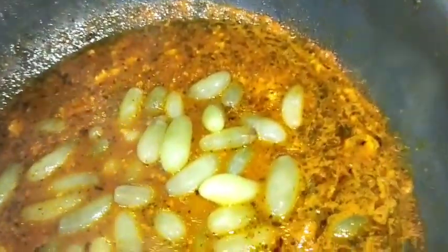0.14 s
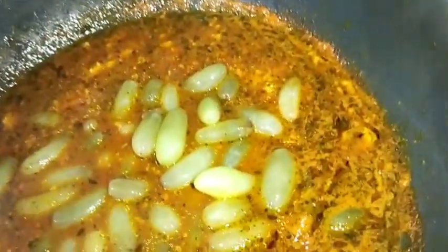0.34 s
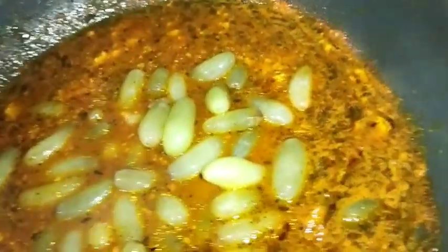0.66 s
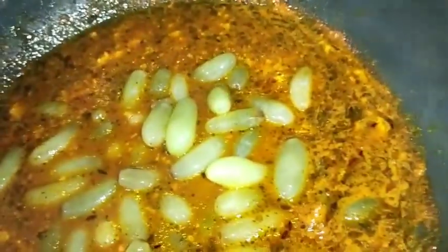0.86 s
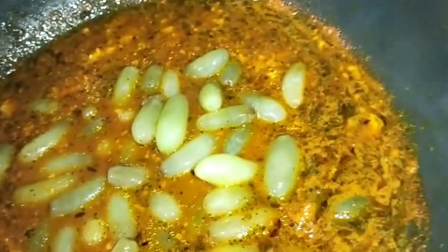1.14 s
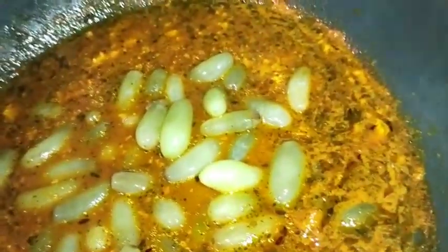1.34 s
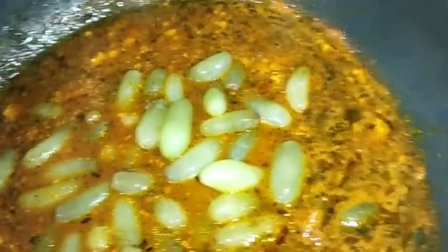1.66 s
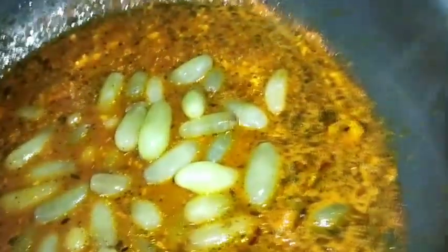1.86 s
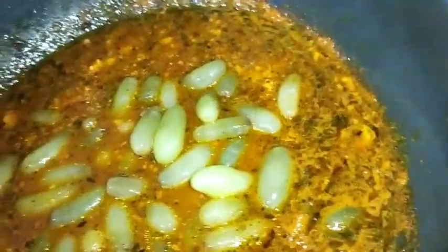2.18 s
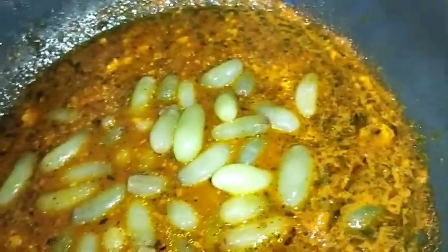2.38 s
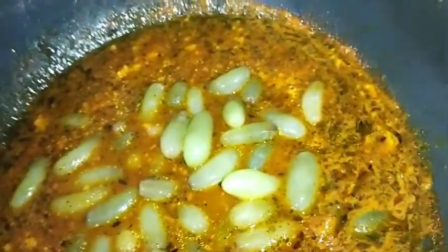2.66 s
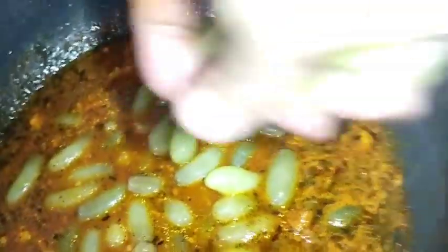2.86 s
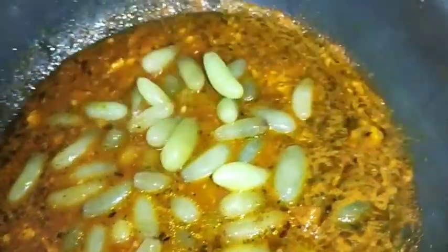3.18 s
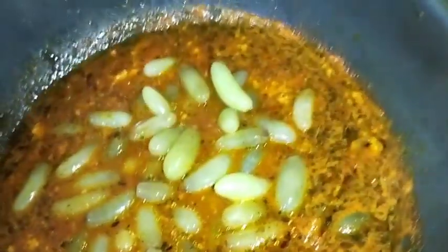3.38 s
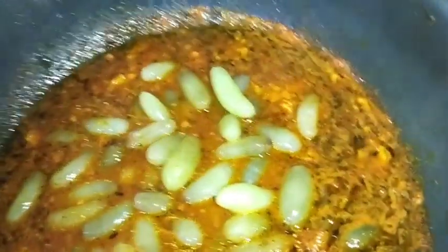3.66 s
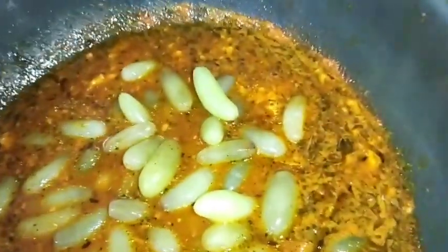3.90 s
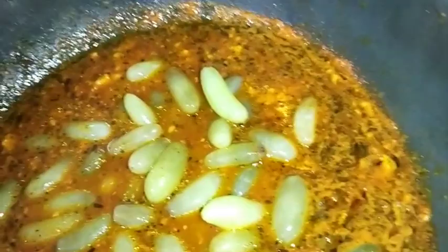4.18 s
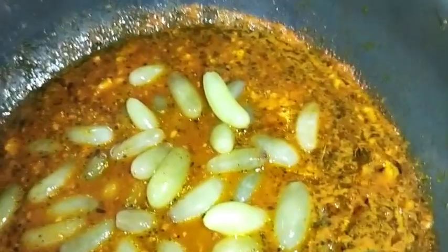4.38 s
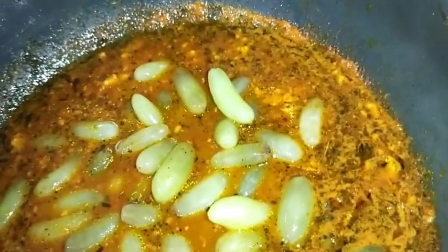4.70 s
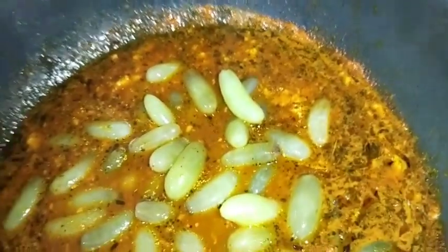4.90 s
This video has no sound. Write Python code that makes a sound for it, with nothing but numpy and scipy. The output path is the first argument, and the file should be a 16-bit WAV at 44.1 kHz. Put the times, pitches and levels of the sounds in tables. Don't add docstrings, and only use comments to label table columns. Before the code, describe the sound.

First a bowl is set down, clacking brightly and ringing briefly over soft, low bubbling. Before two seconds a sharp lid clack comes, then a smaller rim clatter. The simmer continues with muffled plops, gulps and faint fat spits, until a door shuts with a soft thud. Reverberant home kitchen, stereo handheld microphones, faint hiss, little deep bass.

```python
import sys
import numpy as np
from scipy import signal
from scipy.fft import rfft, irfft, next_fast_len
from scipy.io import wavfile
from scipy.ndimage import uniform_filter1d, map_coordinates

SR = 44100
rng = np.random.default_rng(int(sys.argv[2]) if len(sys.argv) > 2 else 0)


def generate_wav(signal):
    frames = np.transpose(np.atleast_2d(signal))
    scaled = np.clip(frames, -1, 1) * 32767
    pcm = np.round(scaled).astype(np.int16)
    wavfile.write(sys.argv[1], SR, pcm)


def ratio(d):
    e = np.asarray(d, float) / 20
    return 10 ** e


N = 222395

# time in seconds, strength in dB.
BOIL_STRENGTH = [(0.5, -61), (0.55, -72.5), (1.32, -62.5), (1.44, -72), (1.66, -63), (2.31, -61.5),
                 (2.43, -71.5), (2.52, -63), (2.6, -67.5), (2.72, -62), (2.87, -76), (3.01, -56.5),
                 (3.33, -72.5), (3.78, -67), (3.84, -73), (4.39, -61), (4.5, -69), (4.72, -55)]


def simmer():
    boil_db = np.interp(np.arange(N) / SR, *np.transpose(BOIL_STRENGTH))
    cluster_bubbling, cluster_steaming = bubble_clusters()
    bubbling = ratio(boil_db - 12) + cluster_bubbling
    steaming = ratio(boil_db - 13) + cluster_steaming
    roll = wobble(21.995)
    liquid = rumble(boil_db, roll) + bubbles(bubbling, roll) + ratio(-5) * bubbling * single_bubbles()
    return liquid + steam(steaming, roll) + pan_hum(boil_db) + pan_wall(bubbling)


# start in seconds, length in seconds, bubbling in dB, steam against bubbling in dB.
CLUSTERS = [(0.341, 0.12, -70.5, 9.5), (0.778, 0.022, -64.5, -10), (0.959, 0.042, -70, -2.5),
            (1.115, 0.11, -68.5, -0.5), (1.291, 0.19, -76.5, -4), (1.529, 0.029, -53, -10.5),
            (1.602, 0.1, -61, -8), (2.142, 0.051, -66, -8.5), (2.277, 0.17, -66.5, -7),
            (2.465, 0.14, -75, -4), (2.595, 0.088, -63, -5.5), (2.773, 0.051, -64, -12.5),
            (2.875, 0.047, -62.5, -19), (2.953, 0.13, -60, -19), (3.202, 0.097, -67, -14.5),
            (3.268, 0.042, -60, -8.5), (3.405, 0.064, -71, -2.5), (3.505, 0.1, -66, -10),
            (3.702, 0.027, -64, -15), (3.795, 0.17, -60, -11), (3.984, 0.062, -81, 11.5),
            (4.036, 0.047, -63.5, -9.5), (4.083, 0.16, -60.5, -4.5), (4.279, 0.1, -61, -4.5),
            (4.324, 0.16, -82, 13), (4.422, 0.079, -61.5, -25), (4.535, 0.11, -59, -12.5)]


def bubble_clusters():
    shape = dict(rise_s=0.013, sag_db=8, t60=0.25)
    bubbling = swells([(s, length, db) for s, length, db, _ in CLUSTERS], **shape)
    steaming = swells([(s, length, db + over) for s, length, db, over in CLUSTERS], **shape)
    return bubbling, steaming


# frequency in Hz, level in dB per Hz.
RUMBLE_SPECTRUM = [(24, -40), (40, -26), (96, 0.5), (140, -3), (255, -1.5), (323, -13), (350, -4.5),
                   (460, -36.5), (770, -120)]


def rumble(boil_db, roll):
    gain = ratio(boil_db + 0.5 * roll + 0.83 * wobble(30))
    return gain * rush(coloured(RUMBLE_SPECTRUM), patchy_db=1.5)


# frequency in Hz, level in dB per Hz.
BUBBLE_SPECTRUM = [(260, -43), (450, -10.5), (599, -6), (741, -4), (936, -7), (1010, -3.5), (1050, -16),
                   (1160, -4.5), (1600, -12), (2080, -34.5), (3520, -120)]


def bubbles(bubbling, roll):
    gain = bubbling * ratio(1.8 * roll + 2.4 * wobble(40))
    return gain * rush(coloured(BUBBLE_SPECTRUM), patchy_db=2.2)


def single_bubbles(count=900):
    t = np.arange(1500) / SR
    when, size, side = rng.random((count, 3)).T[:, :, None]
    hz = 758 * np.exp(0.35 * rng.standard_normal((count, 1)))
    age = t * hz / 3
    envelope = ratio(-2.5 * np.log(1 - size)) * age * np.exp(-4 * age)
    tone = envelope * np.sin(2 * np.pi * hz * t * (1 + 0.064 * age))
    at = ((when * N).astype(int) + np.arange(len(t))).ravel()
    gains = (side + .5, 1.5 - side)
    return unit(np.array([np.bincount(at, (tone * g).ravel(), N)[:N] for g in gains]))


# frequency in Hz, level in dB per Hz.
STEAM_SPECTRUM = [(760, -37), (1300, -16.5), (1600, -33), (1850, 1), (2550, -2), (2850, -4.5), (3300, -8.5),
                  (4020, -6), (4410, -7.5), (7100, -18), (8460, -14), (11500, -24.5), (15400, -25)]
# frequency in Hz, width in Hz, level in dB.
STEAM_JETS = [(1809, 66, -1.5), (2015, 43, -2), (2920, 34, -2), (3514, 99, -4), (4070, 60, -3.5),
              (5700, 37, -8), (6520, 35, -7), (8350, 200, -7)]


def steam(steaming, roll):
    broad = rush(coloured(STEAM_SPECTRUM), patchy_db=1.5)
    whistles = rush(resonances(STEAM_JETS), patchy_db=2.5)
    return steaming * ratio(1.5 * roll + 1.6 * wobble(55)) * (broad + ratio(-3) * whistles)


# frequency in Hz, width in Hz, level in dB.
PAN_MODE = [(415, 58, 0)]
# start in seconds, length in seconds, hum in dB.
FLOOR_BUBBLES = [(.002, 0.039, -52), (.05, 0.037, -48), (.2, 0.14, -54.5), (.41, 0.017, -45.5),
                 (.585, 0.035, -62), (.78, 0.034, -53), (1.111, 0.016, -66), (1.19, 0.023, -62.5),
                 (1.56, 0.042, -69), (1.82, 0.045, -69), (1.97, 0.12, -77), (2.042, 0.045, -54.5),
                 (2.22, 0.068, -52), (2.35, 0.057, -67.5), (2.478, 0.047, -63), (2.545, 0.03, -60),
                 (2.61, 0.039, -57), (2.716, 0.02, -61.5), (2.9, 0.024, -66.5), (2.968, 0.02, -45.5),
                 (3.01, 0.014, -42.5), (3.045, 0.034, -53), (3.105, 0.013, -51.5), (3.205, 0.014, -62.5),
                 (3.415, 0.0086, -57.5), (3.645, 0.019, -67.5), (4.035, 0.1, -63), (4.145, 0.03, -48.5),
                 (4.35, .11, -64.5), (4.535, 0.04, -64), (4.6, 0.065, -55.5), (4.75, 0.18, -52.5)]


def pan_hum(boil_db):
    humming = ratio(boil_db - 5) + swells(FLOOR_BUBBLES, rise_s=.005, sag_db=2, t60=.05)
    mode = evened(rush(resonances(PAN_MODE), patchy_db=0.1), share=.35)
    return humming * ratio(0.51 * wobble(26)) * mode


# frequency in Hz, width in Hz, level in dB.
WALL_MODES = [(593, 73, -2), (988, 12, 1), (1202, 36, -3.5)]


def pan_wall(bubbling):
    return ratio(-6) * bubbling * rush(resonances(WALL_MODES), patchy_db=-1.0)


def crockery():
    return bowl_set_down() + bowl_ringing() + lid() + door() + ticks()


# time
# in seconds, peak in dB, contact length in seconds, room echo in dB, brightness in dB per octave.
BOWL_LANDINGS = [
    (0.0028, -27.5, 0.011, 7.5, -1.5),
                 (0.188, -21.5, 0.0032, 5, -0.3),
    (0.198, -9.5, 0.0057, -4, -0.25),
    (0.213, -16, 0.0055, -14, -0.26),
    (0.238, -27, 0.0024, 6, -0.59),
]
# frequency in Hz, level in dB per Hz.
BOWL_SPECTRUM = [(70, -61.5), (120, -63), (224, -13.5), (310, -31), (650, -15), (1100, -9.5), (1350, -1.5),
                 (1500, -8), (2200, -8), (3100, -10), (3500, -15.5), (5000, -29), (7000, -48),
                 (15000, -73.5)]


def bowl_set_down():
    return struck(BOWL_LANDINGS, BOWL_SPECTRUM, lag=1.1)


# frequency in Hz, level in dB, decay time t60 in seconds.
RING_MODES = [(834, -9, .4), (1024, -6, .5), (1135, -7, .45), (1194, 0, .45), (1270, -7, .55),
              (1337, -5, .2), (1351, 0, .6), (1578, -7, .3), (1722, -10, .45), (1822, -7, .35),
              (1882, -5, .5), (1943, -8, .4), (2552, -10, .4), (3075, -9, .36), (3189, -3, .5),
              (3221, -3, .6), (3242, 2, .38), (4686, -16, .36), (5660, -31, .3), (7230, -28, .3),
              (7400, -31, .2), (10170, -33, .2), (11060, -36, .3), (12500, -41, .25), (13660, -43, .3)]
# time in seconds, ring in dB.
RING_BLOWS = [
    (-.035, -38),
    (.188, -42),
    (.199, -21.5),
]


def bowl_ringing():
    out, t = np.zeros((2, N + 2 * SR)), np.arange(TAIL) / SR
    hz, level, t60 = np.transpose(RING_MODES)[:, :, None, None]
    for s, db in RING_BLOWS:
        phase, speed, beat_start = rng.random((3, len(RING_MODES), 2, 1))
        phase = phase[:, :1] + [[0], [1 / 4]]
        beat_phase = 2 * np.pi * (12 * (.5 + speed) * t + beat_start)
        beats = 1 + sum(.55 * np.cos(k * beat_phase) for k in (1, 2.3))
        modes = ratio(level - 60 * t / t60) * beats * np.sin(2 * np.pi * (hz * t + phase))
        ring = np.sum(modes, 0)
        ring = ring * np.exp(-(t / .295) ** 4)
        ring = ring * (1 - .7 * np.exp(-t / .03))
        out[:, round(s * SR) + SR // 2:][:, :TAIL] += ratio(db) * ring
    return out[:, SR // 2:][:, :N]


# time in seconds, peak in dB, contact length in seconds,
# room echo in dB, brightness in dB per octave.
LID_CONTACTS = [
    (1.754, -12.5, 0.0025, -4, 0),
]
CATCH_CONTACTS = [
    (1.732, -24, 0.005, -3, 0.35),
]
RIM_CONTACTS = [
    (1.973, -50.5, 0.0029, 8, 0.3),
    (1.981, -32, 0.00067, 2.5, 0.44),
    (1.987, -21, 0.0056, -1.5, 0.25),
    (2.019, -24.5, 0.0027, -5.5, 0.23),
]
# frequency in Hz, level in dB per Hz.
LID_SPECTRUM = [(71, -57), (120, -44), (331, -15.5), (423, -13.5), (717, -6), (1010, 3.5), (1650, 1),
                (1860, 7), (2500, 2.5), (3500, 1.5), (5000, -8.5), (7120, -19.5), (8550, -10.5),
                (10500, -25.5), (13000, -30.5), (15400, -39)]
CATCH_SPECTRUM = [(240, -15), (400, -19), (956, -37), (1560, -4), (2540, -11), (3050, 8), (9310, -27),
                  (15400, -44)]
RIM_SPECTRUM = [(71, -58), (120, -31), (794, -14), (1010, -8.5), (1270, -9.5), (1830, -6.5), (2060, -7.5),
                (2480, -6), (2800, -6.5), (8380, -26), (15400, -31)]


def lid():
    catch = struck(CATCH_CONTACTS, CATCH_SPECTRUM, lag=20, slow=0.81)
    clack = ratio(2.5) * struck(LID_CONTACTS, LID_SPECTRUM, lag=18.85)
    rim = struck(RIM_CONTACTS, RIM_SPECTRUM, lag=6.2, slow=0.71)
    return catch + clack + rim


# time in seconds, peak in dB, contact length in seconds,
# room echo in dB, brightness in dB per octave.
DOOR_CONTACTS = [
    (4.733, -38, 0.0085, 2, -3.5),
    (4.739, -28.5, 0.0064, 2.9, 1.6),
    (4.747, -24, 0.0058, 5.7, -0.03),
    (4.754, -32.5, 0.014, 5.4, 0),
    (4.774, -36.5, 0.0081, 0.44, 8),
]
# frequency in Hz, level in dB per Hz.
DOOR_SPECTRUM = [(29, -41), (50, -12), (100, -8), (140, -15.5), (172, -3), (200, -10.5), (228, -10),
                 (274, -19.5), (423, -13.5), (524, -14), (577, -8.5), (847, -3.5), (1270, -10), (2210, -9),
                 (3600, -18), (4250, -12.5), (5200, -22.5), (8670, -24), (12300, -29), (15400, -45.5)]


def door():
    return struck(DOOR_CONTACTS, DOOR_SPECTRUM, slow=1.38, build_s=0.013, rise_s=0.0058)


# time in seconds, peak in dB, contact length in seconds,
# room echo in dB, brightness in dB per octave.
TICK_CONTACTS = [
    (1.614, -46.5, 0.0029, -2, 8.5),
    (2.782, -66, 0.0035, 4, -4),
    (3.556, -54.5, 0.0034, -3, 3),
    (4.27, -48, 0.0086, 11, 0.5),
    (4.547, -54, 0.004, 5.5, 7),
]
# frequency in Hz, level in dB per Hz.
TICK_SPECTRUM = [(290, -41), (500, -1.5), (913, 0.5), (1620, -17), (2100, 8.5), (2500, -3), (3270, -7),
                 (6430, -29), (8560, -29), (15400, -59)]


def ticks():
    return ratio(-3) * struck(TICK_CONTACTS, TICK_SPECTRUM, slow=0.5, rise_s=0.0007)


# time in seconds, peak in dB,
# contact length in seconds, room echo in dB, brightness in dB per octave.
GULP_EVENTS = [(1.529, -49, .004, 1.5, 0.0057), (3.331, -51.5, 0.0035, -1, 0.0026),
               (3.496, -55, .004, -3, 0.0032), (3.707, -52, 0.0042, -0.5, 0.0033),
               (4.094, -43, .008, -4, 0)]
PLOP_EVENTS = [(2.965, -45.5, 0.0086, 4.5, -1.5), (3.011, -40, 0.011, -13, 0.5),
               (3.03, -39.5, 0.0036, -2, -4), (3.046, -52, 0.004, 5.5, 2.5), (3.079, -67, 0.0073, -14, 9),
               (3.105, -47.5, 0.0049, -25, -5.5), (3.495, -56, 0.0055, -14, 2),
               (3.706, -65.5, 0.0086, -5.5, 1), (4.093, -47, 0.01, -9, -0.5)]
SPIT_EVENTS = [(0.6157, -80, 0.0018, -15, 0.24), (0.6688, -60, 0.0016, 3.5, 0.46),
               (1.125, -51, 0.0053, 3.5, 0.59), (2.195, -75, 0.0018, -17, 0.67),
               (2.2245, -55, 0.00075, 3, 1.8), (2.351, -51.5, 0.0016, -0.5, 1.2),
               (3.017, -53, 0.0013, -2, 2.2), (3.0494, -60, 0.0018, 1, 0.55),
               (4.1244, -56, 0.0016, -29, 0.5), (4.145, -54, 0.0016, 14.5, 0.18),
               (4.5126, -73, 0.0024, -37, 0.5)]
# frequency in Hz, level in dB per Hz.
GULP_SPECTRUM = [(250, -62), (480, -11.5), (720, 3), (1000, -7.5), (1400, -17), (2500, -21.5), (6000, -30),
                 (15400, -58)]
PLOP_SPECTRUM = [(47, -84), (80, -40), (218, -13), (320, -14), (428, -5.5), (889, -23.5), (1140, -52.5),
                 (2240, -39.5), (8000, -44.5), (10400, -40.5), (17600, -120)]
SPIT_SPECTRUM = [(530, -11), (900, -2.5), (1950, -10.5), (2220, -10), (3450, -10.5), (3790, -15),
                 (9930, -26), (15400, -41)]


def drops():
    gulps = struck(GULP_EVENTS, GULP_SPECTRUM, slow=0.25)
    plops = struck(PLOP_EVENTS, PLOP_SPECTRUM, slow=0.33)
    spits = struck(SPIT_EVENTS, SPIT_SPECTRUM, slow=0.25)
    return gulps + plops + spits


def struck(hits, spectrum, lag=0, slow=1, build_s=0.0014, rise_s=0.00017):
    out, t = np.zeros((2, N + 2 * SR)), np.arange(TAIL) / SR
    for s, db, length, room_db, tilt_db in hits:
        body = causal(spectrum, tilt_db)
        blow = rng.standard_normal(TAIL) * np.exp(-t / max(length, 1e-4)) * (1 - np.exp(-t / rise_s))
        direct = signal.fftconvolve(blow, body)[:TAIL]
        direct = direct / np.abs(direct).max()
        spread = body / np.linalg.norm(body) + .25 * direct[:len(body)] / np.linalg.norm(direct)
        echo = signal.fftconvolve(spread[None], kitchen(build_s, slow), axes=1)[:, :TAIL]
        delays = np.array([[lag], [0]])
        heard = filtered(direct, lambda hz: np.exp(-2j * np.pi * hz / SR * delays))
        heard = heard + ratio(room_db + 21.0) * echo
        start = round(s * SR) + SR // 2
        out[:, start:start + TAIL] += ratio(db) * heard
    return out[:, SR // 2:][:, :N]


# frequency in Hz, decay time t60 in seconds.
REVERB_TIME = [(100, 0.91), (500, 0.65), (2000, 0.44), (6000, 0.42), (14000, 0.38)]
TAIL = 32768


def kitchen(build_s, slow=1):
    hz, t, z = signal.stft(rng.standard_normal((2, TAIL)), SR, nperseg=256)
    decay = ratio(-60 * t / (slow * along(REVERB_TIME, hz)[:, None]))
    tail = signal.istft(z * decay, SR, nperseg=256)[1][:, :TAIL]
    bunches = unit(uniform_filter1d(rng.standard_normal(TAIL), size=90))
    tail = tail * ratio(1.3 * bunches)
    tail = two_ports(tail * (1 - np.exp(-np.arange(TAIL) / SR / build_s)))
    return tail / np.linalg.norm(tail[0])


# frequency in Hz, left-right correlation from -1 to 1.
LIKENESS = [(40, .95), (180, .91), (350, .82), (700, .5), (1410, -.12), (3090, .06), (15000, .06)]


def two_ports(pair):
    turn = lambda hz: np.arccos(np.clip(along(LIKENESS, hz), -1, 1)) / 2
    mid, side = filtered(pair, lambda hz: np.array([np.cos(turn(hz)), np.sin(turn(hz))]))
    return np.array([mid + side, mid - side])


# frequency in Hz, level in dB per Hz.
HISS_SPECTRUM = [(590, -32.5), (1000, 3), (1080, -10), (1210, 0.5), (1440, -32), (2060, -19), (7000, -20.5),
                 (8500, -19.5), (15400, -40.5)]


def microphone_hiss():
    return ratio(-74.5) * rush(coloured(HISS_SPECTRUM), patchy_db=3.5)


def gated(x, floor_db):
    hz, _, z = signal.stft(x, SR, nperseg=512)
    power = np.mean(np.abs(z) ** 2, 0)
    power = uniform_filter1d(uniform_filter1d(power, size=25, axis=0), size=5, axis=1)
    edge = ratio(2 * (floor_db + along(HISS_SPECTRUM, hz)))[:, None]
    gain = power ** 2 / (power ** 2 + edge ** 2)
    return signal.istft(z * gain, SR, nperseg=512)[1][:, :N]


def rush(response, patchy_db):
    z = signal.stft(rng.standard_normal((2, N)), nperseg=512)[2]
    field = rng.standard_normal(z.shape[1:])
    field = uniform_filter1d(uniform_filter1d(field, size=4, axis=0), size=7, axis=1)
    pair = signal.istft(z * ratio(patchy_db * unit(field)), nperseg=512)[1][:, :N]
    return unit(two_ports(filtered(pair, response)))


def coloured(spectrum):
    return lambda hz: ratio(along(spectrum, hz))


def resonances(peaks):
    def response(f):
        total = 0
        for k, (centre, width, db) in enumerate(peaks):
            damping = 1j * f * width
            total = total + (-1) ** k * ratio(db) * damping / (centre * centre - f * f + damping)
        return total ** 2
    return response


def causal(spectrum, tilt_db):
    hz = np.fft.rfftfreq(4096, 1 / SR)
    level_db = along(spectrum, hz) + tilt_db * np.log2(hz / 2000 + .1)
    cepstrum = irfft(np.log(ratio(level_db) + 1e-6))
    cepstrum[1:2048] *= 2
    cepstrum[2049:] = 0
    return irfft(np.exp(rfft(cepstrum)))[:2048]


def swells(rows, rise_s, sag_db, t60):
    start, length, db = np.transpose(rows)[:, :, None]
    t = np.maximum(np.arange(0, N + 64, 64) / SR - start, 0)
    level_db = db - sag_db * np.minimum(t / length, 1) - 60 * np.maximum(t - length, 0) / t60
    shape = (1 - np.exp(-t / rise_s)) * ratio(level_db)
    return np.interp(np.arange(N) / 64, np.arange(t.shape[1]), shape.sum(0))


def evened(x, share):
    power = np.abs(uniform_filter1d(np.mean(x ** 2, 0), size=441))
    return x / (power + .05) ** (share / 2)


def wobble(rate):
    knots = rng.standard_normal(int(N * 60 / SR) + 4)
    return map_coordinates(knots, [np.arange(N) * rate / SR])


def filtered(x, response):
    m = next_fast_len(x.shape[-1] + 8192)
    return irfft(rfft(x, m) * response(np.fft.rfftfreq(m, 1 / SR)), m)[..., :x.shape[-1]]


def along(points, hz):
    f, v = np.transpose(points)
    return np.interp(np.log(hz + 1), np.log(f + 1), v)


def unit(x):
    return x / np.sqrt(np.mean(x ** 2) + 1e-20)


def scene():
    return simmer() + gated(ratio(-4) * crockery() + ratio(-3) * drops(), floor_db=-84)


def band_limit(x):
    return signal.sosfilt(signal.butter(12, 15570, fs=SR, output="sos"), x)


def record(dry):
    def microphone(f):
        x = f / 70
        return (1j * x) ** 2 / (1 + 1.4j * x - x ** 2) * (f < 15550)
    heard = filtered(dry + microphone_hiss(), microphone)
    heard = heard * np.minimum(1, np.arange(N) / 100)
    return band_limit(heard)


dry = scene()
out = record(dry)
generate_wav(out)
```